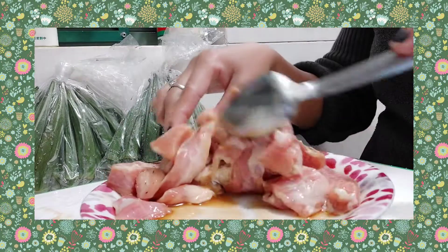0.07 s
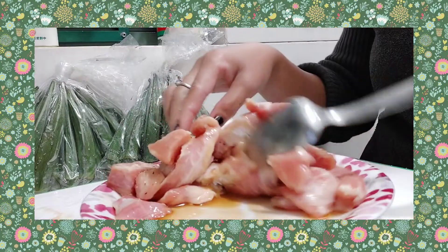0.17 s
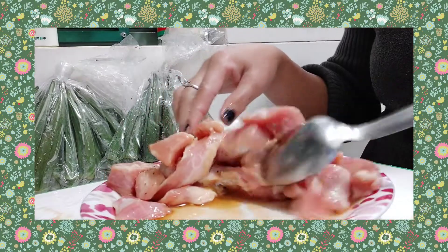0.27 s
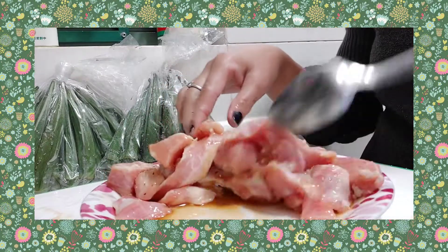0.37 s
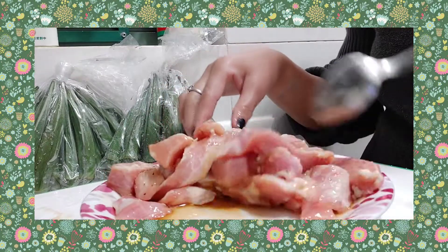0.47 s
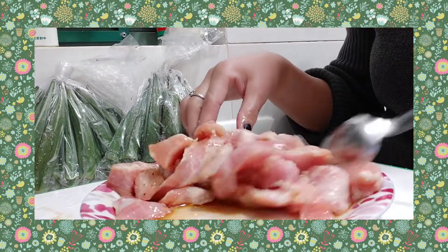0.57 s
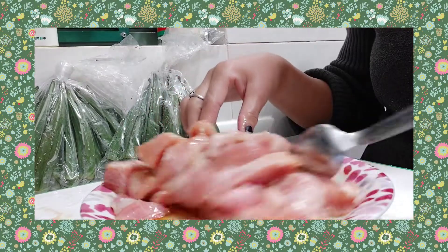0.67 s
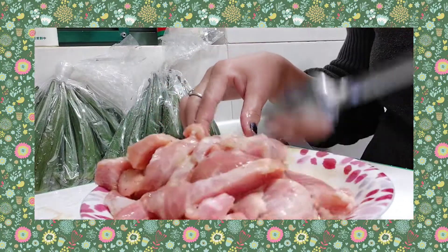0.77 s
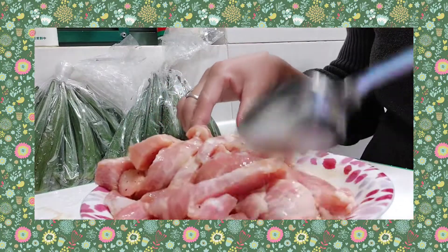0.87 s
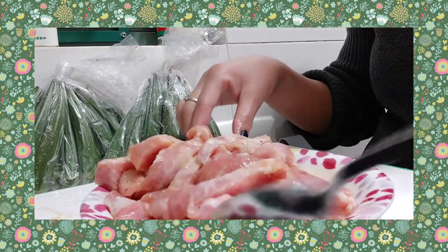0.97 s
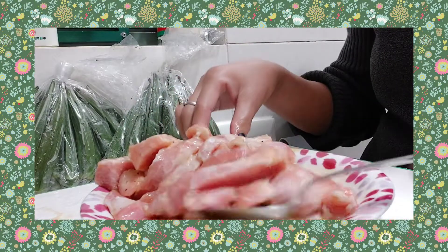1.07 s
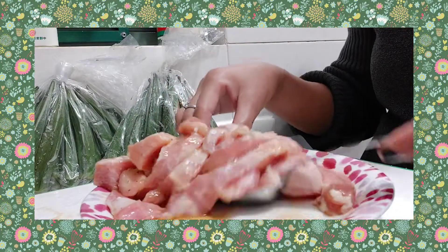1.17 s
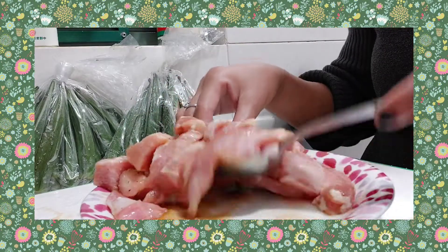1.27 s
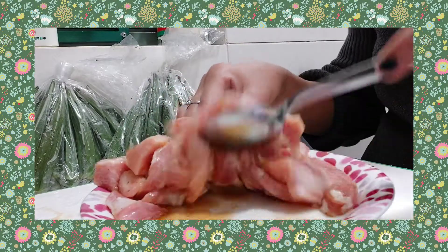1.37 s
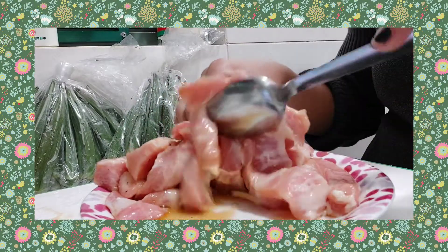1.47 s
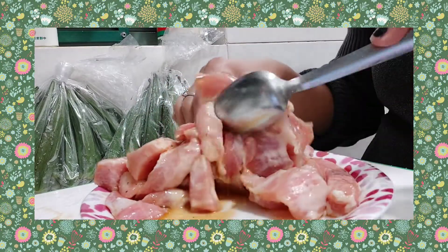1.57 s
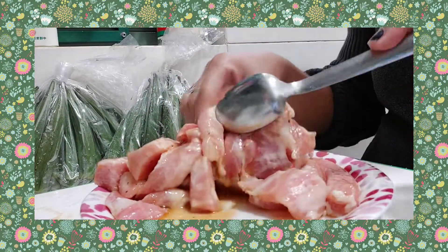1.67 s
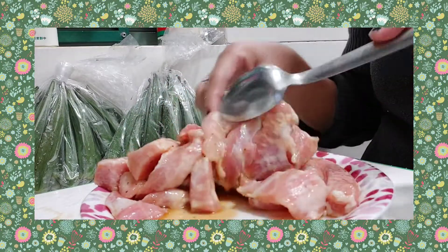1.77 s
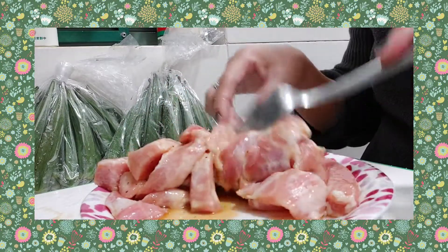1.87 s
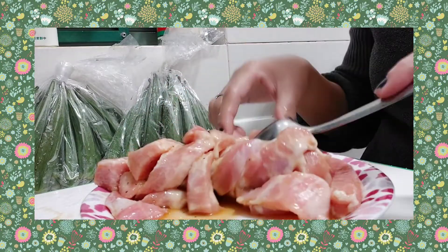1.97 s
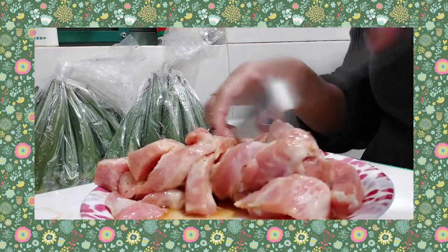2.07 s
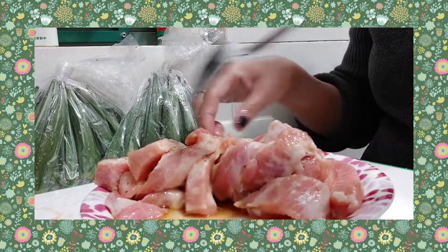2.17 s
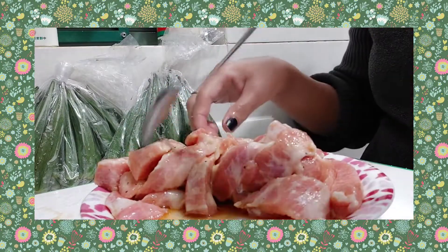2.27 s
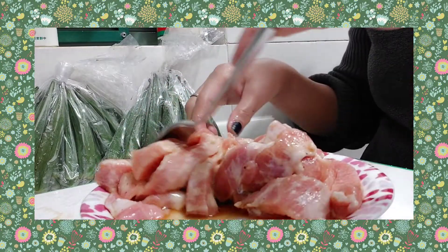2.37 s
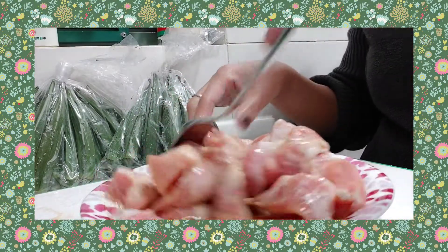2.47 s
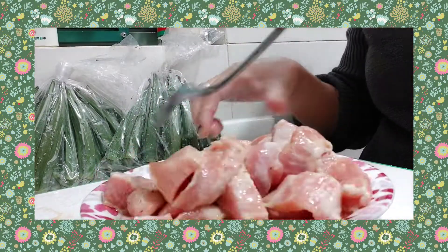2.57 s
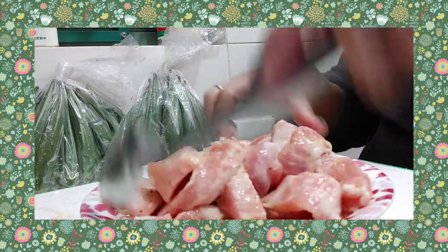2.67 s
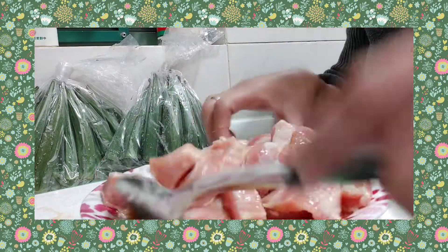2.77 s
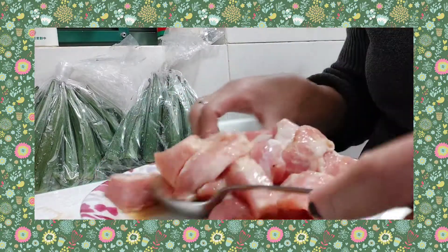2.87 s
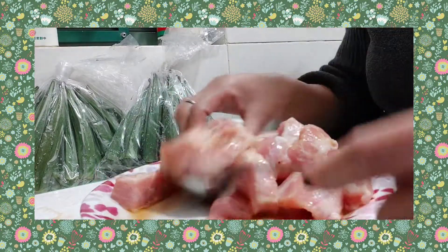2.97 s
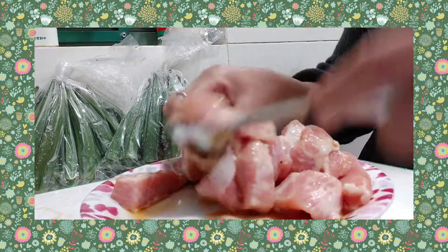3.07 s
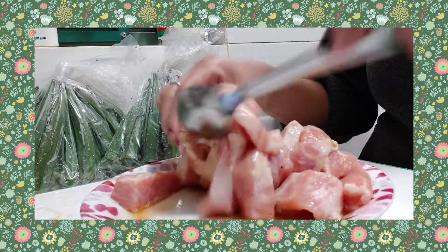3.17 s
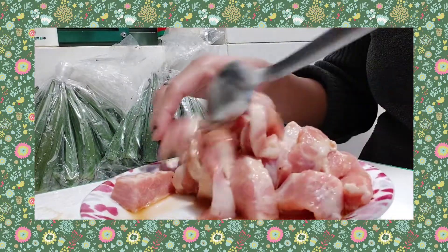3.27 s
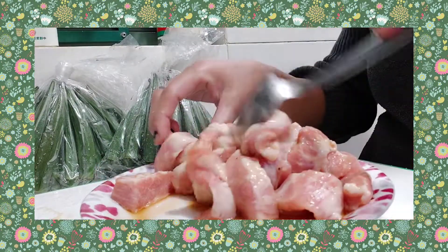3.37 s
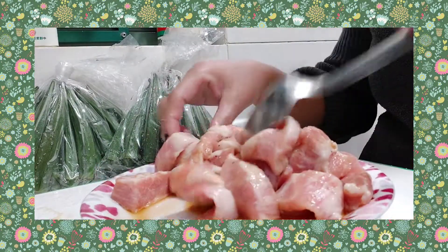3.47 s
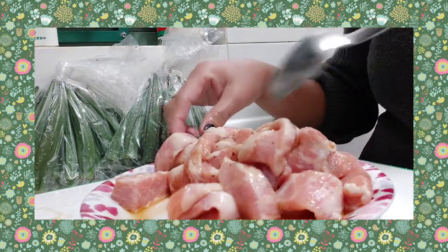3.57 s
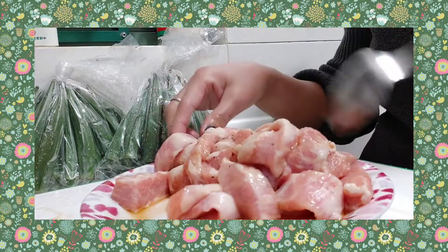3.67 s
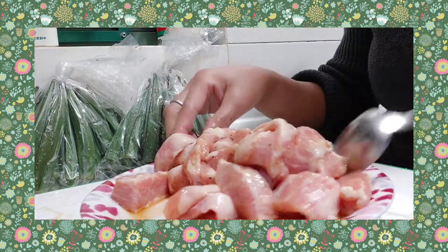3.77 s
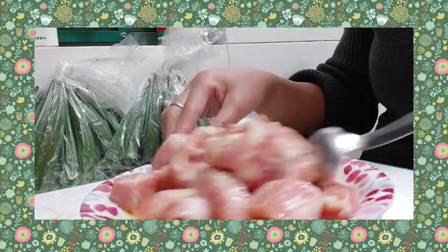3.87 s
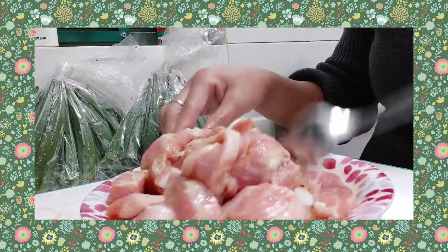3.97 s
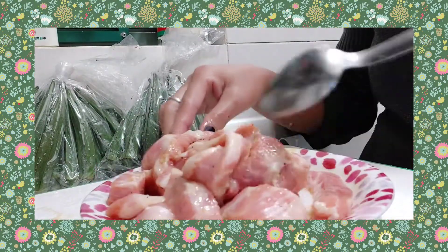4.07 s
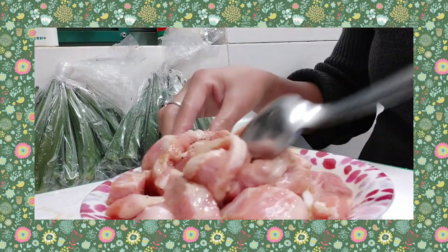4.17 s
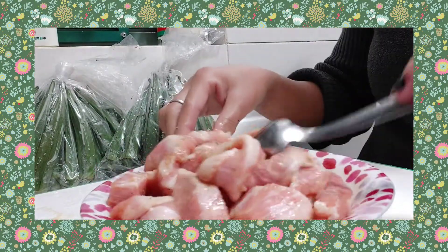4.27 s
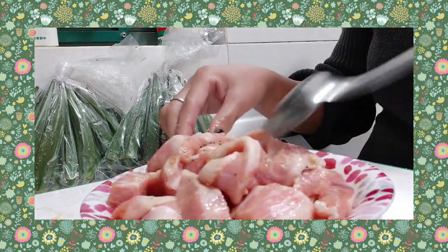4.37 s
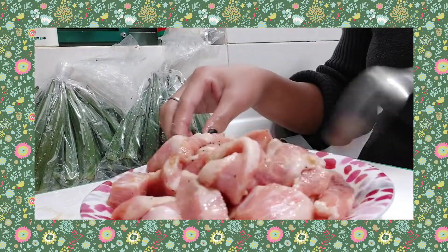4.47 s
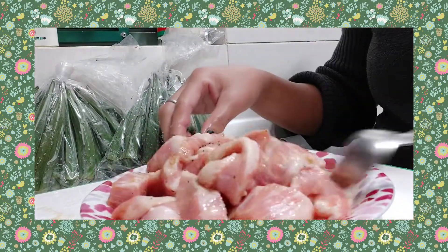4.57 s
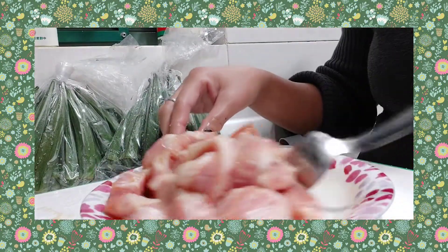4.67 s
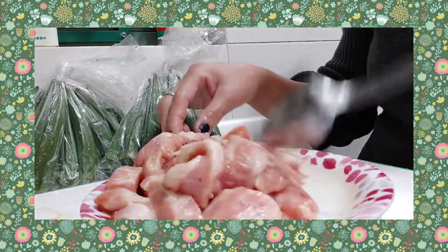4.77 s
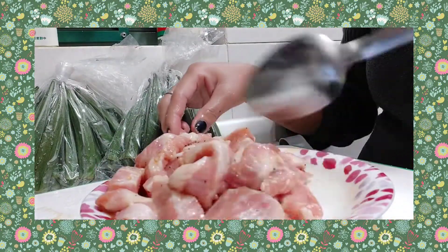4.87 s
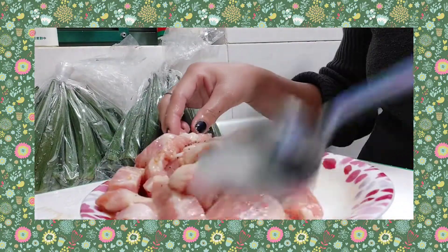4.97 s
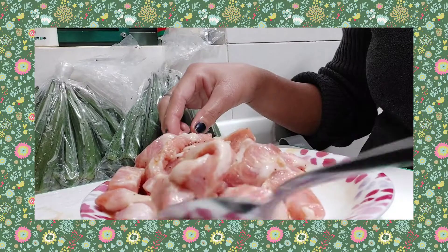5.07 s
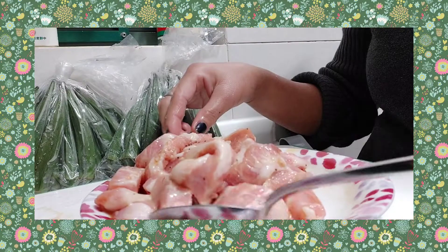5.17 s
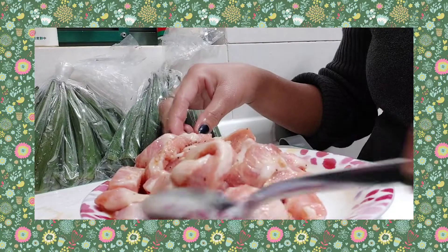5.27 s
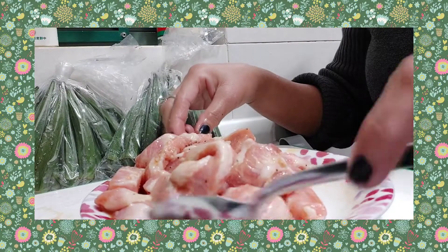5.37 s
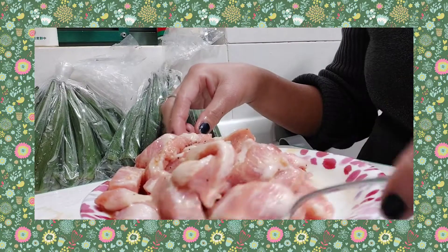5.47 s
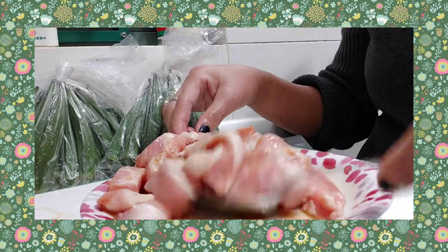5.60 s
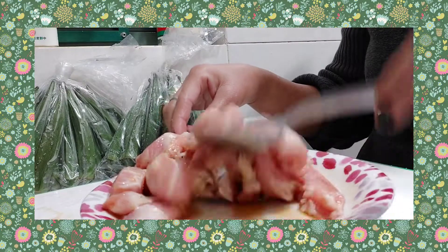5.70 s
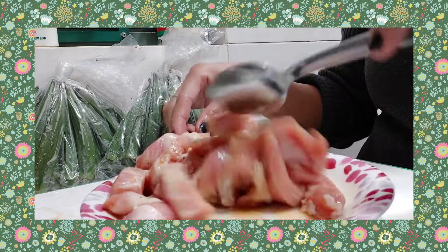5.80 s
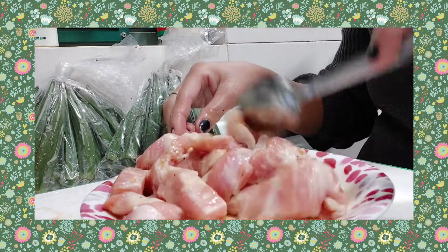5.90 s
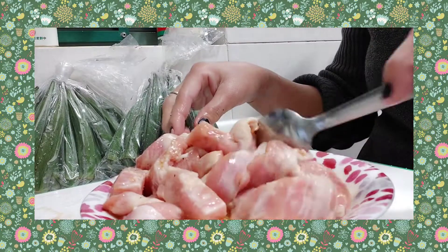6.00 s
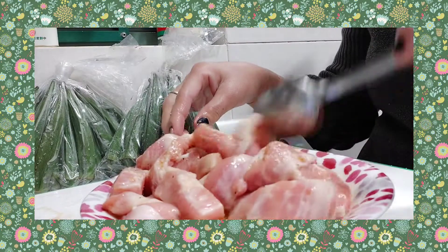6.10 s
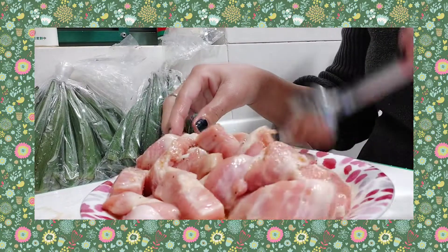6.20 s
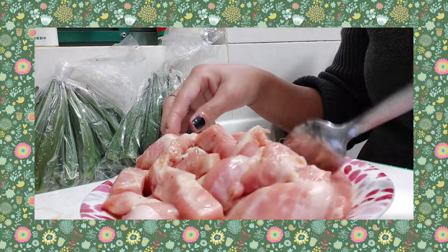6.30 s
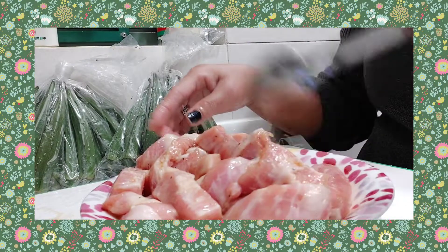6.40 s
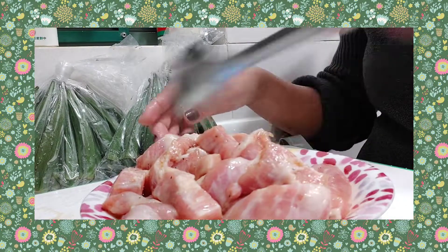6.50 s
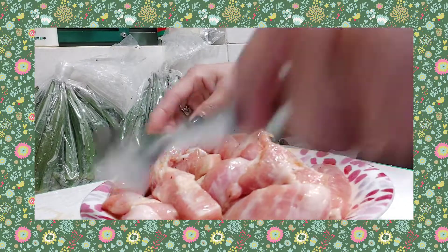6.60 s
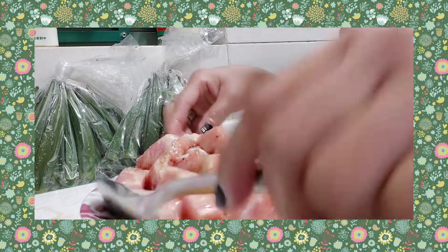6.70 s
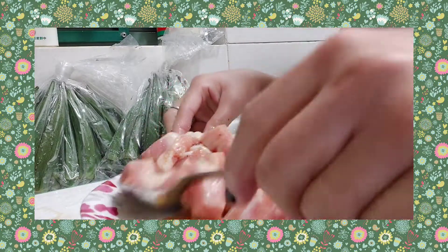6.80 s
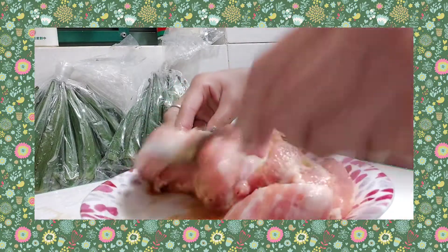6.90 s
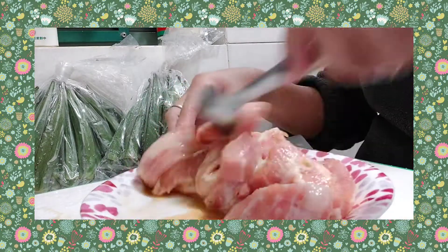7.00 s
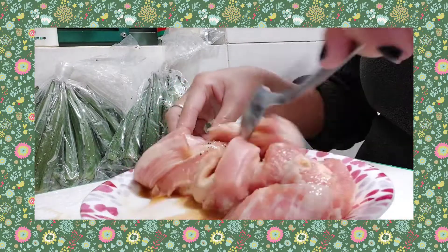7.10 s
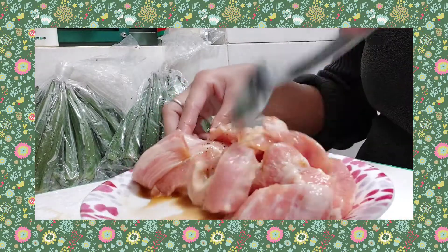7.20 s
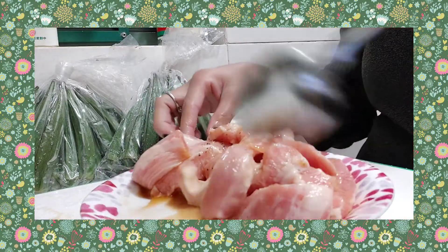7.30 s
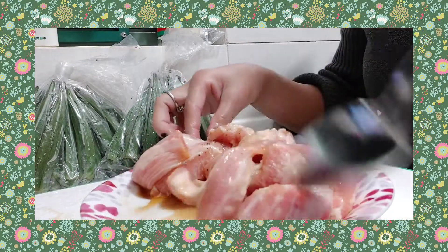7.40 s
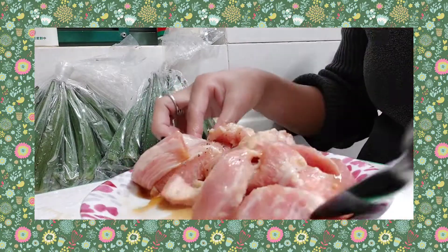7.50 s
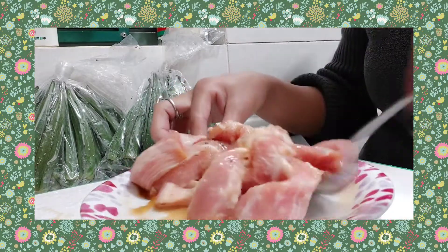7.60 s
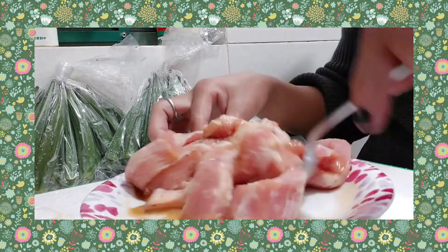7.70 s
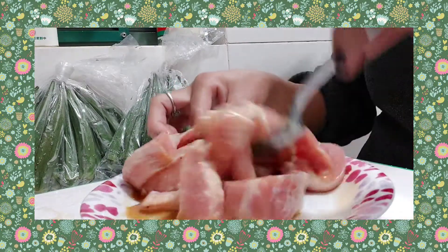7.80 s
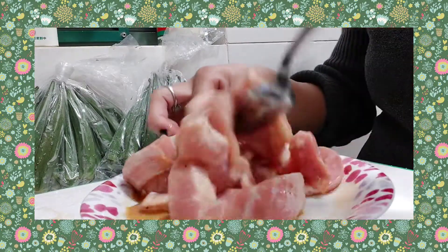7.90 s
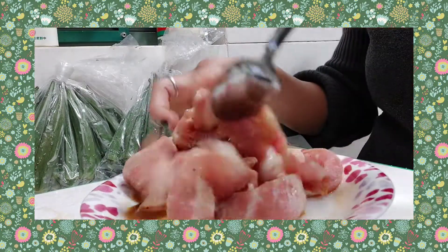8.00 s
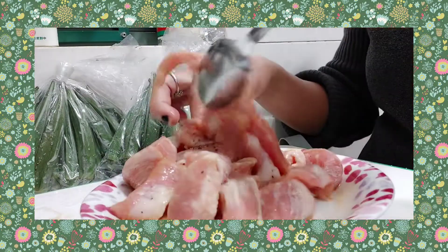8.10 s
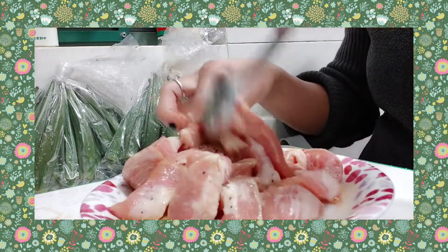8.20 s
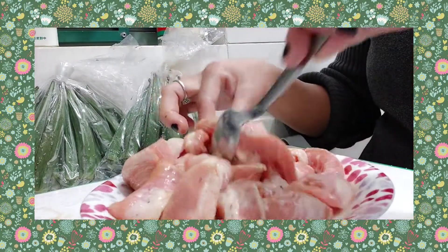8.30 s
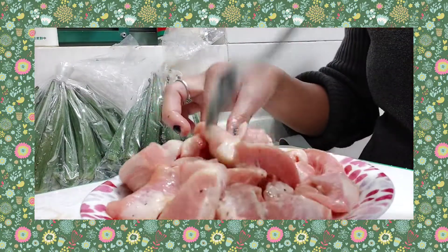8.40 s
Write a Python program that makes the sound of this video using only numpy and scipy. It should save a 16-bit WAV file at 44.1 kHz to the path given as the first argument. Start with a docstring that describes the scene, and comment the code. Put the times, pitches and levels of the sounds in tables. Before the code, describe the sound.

A steel spoon clinks sharply and irregularly on a ceramic plate, with tiny wet smacks of raw meat and a low appliance hum in a kitchen.

```python
"""A small tiled kitchen, heard close up: a steel spoon turns wet raw meat on a ceramic plate.
An appliance hums throughout: filtered noise for the drone and air, wavering sines for the hum.
The meat gives tiny wet smacks, each a short cluster of random pops coloured by one resonance.
Each clink is a noisy contact force through the spoon's modes, plus plate and table modes as fading sines.
Skids over the glaze are chains of catches: random slips through a squeak and the plate's modes."""
import sys
import numpy as np
from scipy import signal
from scipy.fft import rfft, irfft, next_fast_len
from scipy.io import wavfile
from scipy.ndimage import map_coordinates

SR = 44100
rng = np.random.default_rng(int(sys.argv[2]) if len(sys.argv) > 2 else 0)


def dump_mix(stems):
    """Bounce the given channels to the path in sys.argv[1] as a 16-bit WAV at rate SR."""
    frames = np.atleast_2d(stems).T  # one column per channel
    limited = np.clip(frames, -1, 1)  # hard clip at full scale
    pcm = np.round(limited * 32767).astype(np.int16)
    wavfile.write(sys.argv[1], SR, pcm)


N = 372644
T = np.arange(SR * 2 // 5) / SR  # seconds since a contact; every short sound lasts 0.4 s

# Spectrum of the appliance's low drone. Each row: frequency in Hz, relative level in dB.
DRONE_SPECTRUM = [(20, -16.5), (40, -11.5), (65, 0), (95, -4), (122, 2.5), (175, -5.5), (200, -4),
                  (232, -2), (275, -23), (400, -26), (1000, -70)]
# Spectrum of the steady rush of air. Each row: frequency in Hz, relative level in dB.
AIR_SPECTRUM = [(150, -19), (300, -1), (570, 1), (780, -5), (1050, -2.5), (1400, -10), (1750, -6.5),
                (2300, -12.5), (2800, -19.5), (3400, -26.5), (4200, -30.5), (9000, -33.5), (15500, -34.5)]
# The appliance's hum lines. Each row: frequency in Hz, rms level in dB before waver and panning.
HUM_LINES = [(121, -63.5), (172, -62), (420, -74), (990, -79), (1728, -82)]
# Rise and fall of the low drone. Each row: time in seconds, level in dB before the drone trim.
DRONE_LEVELS = [(0.0, -53.5), (1.25, -52.5), (2.21, -54), (2.8, -49), (3.97, -55), (4.47, -47), (5.18, -49),
                (5.62, -53.5), (6.26, -50.5), (8.45, -55)]
# Stereo likeness of the background. Each row: frequency in Hz, left-right correlation from 0 to 1.
STEREO_LIKENESS = [(30, 0.042), (60, .75), (120, 1), (250, 0.54), (500, 0.96), (1500, 0), (6000, 0)]
# Stereo balance of the background. Each row: frequency in Hz, left minus right in dB.
STEREO_BALANCE = [(25, 5), (60, 0.5), (120, 3.5), (250, -2), (500, 4), (2000, 1), (10000, 0)]
# Reverberation of the tiled room. Each row: frequency in Hz, decay time t60 in seconds.
ROOM_DECAY = [(150, 0.94), (1000, 0.22), (4000, 0.21), (9000, 0.15), (16000, 0.17)]
# Clear smacks of wet meat parting. Each row: start in seconds, peak in dB before panning, pitch in Hz.
CLEAR_SMACKS = [(0.9372, -53.5, 3030), (1.4963, -53, 3506), (2.1907, -55, 6600), (3.238, -54, 13100),
                (3.274, -52, 2895), (6.0132, -51, 9380), (6.731, -54, 7410), (7.1921, -50.5, 12670),
                (7.3058, -54.5, 10650), (8.3205, -55, 5660)]
# Spoon on plate. Each row: start in seconds, body, bright and sheen levels in dB before panning,
# chatter t60 in seconds, main ring in Hz, its relative share in dB, second ring in Hz,
# centre of the unexcited region in Hz.
SPOON_HITS = [(0.6978, -30, -22, -22, 0.033, 6940, -9, 1380, 7900),
              (1.1143, -26.5, -29.5, -26.5, 0.028, 2610, -20, 5330, 9900),
              (1.218, -36.5, -29, -35, 0.009, 3830, -16, 4870, 8300),
              (2.8483, -27, -20.5, -20, 0.075, 3820, -8.5, 5310, 6100),
              (2.9002, -33, -24.5, -28, 0.027, 4240, -5, 11040, 10160),
              (4.374, -54.5, -66, -78, 0.04, 3120, -6.5, 1480, 8100),
              (4.6898, -29, -27.5, -21.5, 0.049, 13800, -8.5, 2380, 13200),
              (5.1649, -24, -26, -25, 0.051, 2470, -9.5, 1120, 4220),
              (5.1903, -38, -23, -23.5, 0.047, 4700, -17, 7190, 7130),
              (5.5202, -70, -55.5, -64, 0.025, 5630, -7.5, 4220, 8300),
              (6.0512, -51.5, -62.5, -54.5, 0.031, 2130, -6, 12350, 3760),
              (6.8022, -31.5, -25.5, -22.5, 0.06, 5400, -7.5, 10400, 10500),
              (7.6003, -32, -24.5, -26, 0.048, 3730, -10, 933, 6460),
              (7.7755, -40.5, -42, -50, 0.064, 1820, 0.5, 4550, 3340)]
# Edges between rumble (left out), knock, body, bright and sheen. Each entry: frequency in Hz.
REGISTER_EDGES_HZ = (130, 600, 3000, 8000)
# The hand-held spoon's quickly damped modes. Each row: frequency in Hz, width in Hz, relative level in dB.
SPOON_MODES = [(280, 360, -8), (1090, 300, 5), (1400, 55, -8), (1640, 790, 1.5), (2030, 250, 3),
               (2580, 120, -8), (2966, 360, -1.5), (3560, 180, 5), (4200, 290, 0.5), (5375, 276, 3),
               (5950, 250, 0), (7067, 240, -4.5), (7310, 290, 2.5), (8650, 250, -2), (11000, 540, 2),
               (12100, 340, 0.5), (13340, 350, -1), (14900, 300, -3.5), (15000, 810, 0)]
# The plate's modes, damped by the meat. Each row: frequency in Hz, relative level in dB, t60 in seconds.
PLATE_MODES = [(235.5, 2, 0.15), (297.5, 0, 0.086), (448, -4, 0.2), (789, -9, 0.059), (933, -4, 0.083),
               (1118, -7, .14), (1412, -7, 0.053), (1765, -2, .09), (2460, 2.5, 0.18), (2626, -6.5, 0.12),
               (3775, -0.5, 0.12), (4000, -12, 0.072), (4010, -10.5, 0.2), (4590, -11, .16),
               (5216, -8.5, 0.23), (5362, -12, .24), (5930, -9, 0.029), (6864, -11, .17), (7420, -13, 0.11),
               (7571, -13.5, .14), (9000, -8, 0.18), (10975, -5, .15), (11820, -8, 0.11), (13190, -13, .17),
               (13940, -12.5, .15), (15670, -13, .09)]
# The table under the plate. Each row: frequency in Hz, relative level in dB, t60 in seconds.
TABLE_MODES = [(48.3, -12, 0.15), (69, -0.5, .3), (121, -4.5, .2), (166, -3.5, 0.23)]
# Spoon skidding over glaze. Each row: start in seconds, length in seconds, level in dB before trim,
# easing and scatter, first squeak in Hz, last squeak in Hz.
GLAZE_SKIDS = [(0.761, 0.053, -48, 2660, 2660), (1.262, 0.044, -51, 2100, 2150),
               (2.924, 0.075, -45, 6640, 4200), (3.012, 0.043, -53, 2210, 2200),
               (4.761, 0.029, -37.5, 2600, 2640), (5.394, 0.28, -65, 5560, 4330),
               (5.671, .037, -62.5, 5200, 5230), (6.913, 0.033, -51.5, 4170, 4200),
               (7.645, 0.12, -41, 5030, 4980), (7.684, 0.082, -42.5, 2520, 2400)]

SCOOP_DB = -35  # a clink with a louder body digs under the meat
PEEL_AFTER_S, PEEL_FOR_S = 0.3, 0.9  # the scooped pieces peel apart this much later, for this long
SECOND_RING_DB, CLINK_PAN_DB = -12, 0.8  # relative share of the second ring; lean to the left
KNOCK_DB, KNOCK_GROWTH = 1.37, 1.373  # the knock grows faster than the blow: offset, dB per dB
CATCH_S, GRIP_SHARE = 0.04, 0.8  # spacing aimed for between catches; part of each in which the edge bites
EASE_DB, UNEVEN_DB = 7.5, 3  # easing over a whole skid; scatter in strength from catch to catch
TOP_HZ = 16000


def amp(db):
    """Decibels to gain."""
    return 10 ** (np.asarray(db) / 20)


def unit(x):
    """Scale to rms 1."""
    return x / np.sqrt(np.mean(x ** 2) + 1e-20)


def onset_unit(x):
    """Scale so that the first 25 ms have rms 1."""
    return x / np.sqrt(np.mean(x[..., :SR // 40] ** 2) + 1e-20)


def fade(t60, t=T):
    """Exponential decay, 60 dB in t60 seconds."""
    return np.exp(-np.log(1000) * t / np.maximum(t60, 1e-4))


def along(points, hz):
    """Read a curve of (Hz, value) points on a log frequency axis."""
    point_hz, values = np.transpose(points)
    return np.interp(np.log(hz + 1), np.log(point_hz + 1), values)


def wobble(rate):
    """A smooth random curve with rate knots a second."""
    knots = rng.standard_normal(int(N * rate / SR) + 4)
    return map_coordinates(knots, [np.arange(N) * rate / SR])


def filtered(x, response):
    """Shape the spectrum of x by a response that is a function of frequency."""
    n = x.shape[-1]
    padded = next_fast_len(n + SR // 10)
    spectrum = rfft(x, padded) * response(np.fft.rfftfreq(padded, 1 / SR))
    return irfft(spectrum, padded)[..., :n]


def below(x, edge, order=8):
    """A smooth step from 1 to 0 at the edge: a low-pass gain over Hz, or a release over seconds."""
    return 1 / (1 + (x / edge) ** order)


def resonance(hz, centre_hz, width_hz):
    """Response of one damped mode."""
    return 1j * hz * width_hz / (centre_hz ** 2 - hz ** 2 + 1j * hz * width_hz)


def add(track, s, sound):
    """Mix a short sound into the track at time s."""
    part = track[:, round(s * SR):][:, :len(T)]
    part += sound[:, :part.shape[1]]


def panned(x, pan_db):
    """Lean a stereo sound to the left by pan_db."""
    return x * amp([[pan_db / 2], [-pan_db / 2]])


def in_kitchen(x, near_db, room_db, near_t60=0.045):
    """Direct sound, quick reflections off table and wall, then the tiled room's tail."""
    hz, t, noise = signal.stft(rng.standard_normal((2, len(T))), SR, nperseg=256)
    decay = fade(along(ROOM_DECAY, hz)[:, None], t)
    tail = signal.istft(noise * decay, SR, nperseg=256)[1][:, :len(T)]
    tail *= 1 - fade(0.027)  # the tail swells in behind the near reflections
    near = rng.standard_normal((2, len(T))) * fade(near_t60)
    echo = amp(room_db) * tail / np.linalg.norm(tail[0])
    echo += amp(near_db) * near / np.linalg.norm(near[0])
    return x + signal.fftconvolve(x[None], echo, axes=1)[:, :len(T)]


def wash(colour):
    """Steady coloured noise whose left-right likeness and balance vary with frequency; rms 1."""
    def turn(hz):
        return np.arccos(np.clip(along(STEREO_LIKENESS, hz), -1, 1)) / 2

    def mid_side(hz):
        return colour(hz) * [np.cos(turn(hz)), np.sin(turn(hz))]

    def balance(hz):
        return amp(along(STEREO_BALANCE, hz) * np.array([[0.5], [-0.5]]))

    mid, side = filtered(rng.standard_normal((2, N)), mid_side)
    return unit(filtered(np.array([mid + side, mid - side]), balance))


def appliance(drone_trim_db=1, air_db=-58, waver_db=5.0):
    """A low drone with hum lines wavering in level and phase, and a steady rush of air above it."""
    t = np.arange(N) / SR
    drone_db = np.interp(t, *np.transpose(DRONE_LEVELS)) + drone_trim_db + 0.24 * wobble(11)
    drone = amp(drone_db) * wash(lambda hz: amp(along(DRONE_SPECTRUM, hz)))
    air_colour = lambda hz: amp(along(AIR_SPECTRUM, hz)) * (1 - below(hz, 100))
    air = amp(air_db + 0.297 * wobble(0.99)) * wash(air_colour)
    hum = np.zeros(N)
    for hz, db in HUM_LINES:
        level = amp(db + waver_db * wobble(5.3)) * np.sqrt(2)  # rms to peak
        hum += level * np.sin(2 * np.pi * hz * t + wobble(11))
    return drone + air + panned(hum, 2.4)


def smack(pitch_hz, life=0.022, width_hz=900, spray_db=-25):
    """A film of marinade tears in a short cluster of tiny pops; peak 1."""
    pops = rng.standard_normal(len(T)) ** 3 * fade(life)  # cubing makes the noise spiky
    colour = lambda hz: resonance(hz, pitch_hz, width_hz) + amp(spray_db) * (1 - below(hz, 1500))
    sound = in_kitchen(filtered(pops, colour), near_db=-0.5, room_db=3.0)
    return sound / np.abs(sound).max()


def meat(peel_db=-60, faint_db=-66, spread_db=9, faint_count=26):
    """Clear smacks, softer ones as each scoop peels apart, and faint ones as the pieces settle."""
    track = np.zeros((2, N))
    for s, db, hz in CLEAR_SMACKS:
        add(track, s, amp(db) * smack(hz))
    scoops = [s for s, body, *_ in SPOON_HITS if body > SCOOP_DB]
    # each spell: start, length, loudest peak, and random (time, size, pitch) for every smack
    spells = [(s + PEEL_AFTER_S, PEEL_FOR_S, peel_db, rng.random((2, 3))) for s in scoops]
    spells.append((0, N / SR, faint_db, rng.random((faint_count, 3))))
    for start, length, db, chances in spells:
        for when, size, pitch in chances:
            pitch_hz = 3000 * 3 ** pitch  # 3 to 9 kHz
            add(track, start + when * length, amp(db - spread_db * size) * smack(pitch_hz))
    return panned(track, 1.5)


def contact_force(chatter_t60, rebound_lag=0.074, rebound_db=-3, chatter_db=-2, crack_t60=0.0034):
    """A crack, one rebound and dying chatter; the longer the chatter, the later the rebound."""
    since_rebound = T - rebound_lag * chatter_t60
    rebound = (since_rebound > 0) * fade(crack_t60, np.abs(since_rebound))
    cracks = onset_unit(fade(crack_t60) + amp(rebound_db) * rebound)
    chatter = amp(chatter_db) * onset_unit(fade(chatter_t60))
    return rng.standard_normal(len(T)) * (cracks + chatter)


def spoon_clack(force, favoured, still_hz, broad_db=-1, favoured_db=5.5):
    """The force through the spoon's modes; those with a node at the contact point stay still."""
    strengths = amp(2 * rng.standard_normal(len(SPOON_MODES)))

    def modes(hz):
        return sum(strength * amp(db) * resonance(hz, centre_hz, width_hz)
                   for strength, (centre_hz, width_hz, db) in zip(strengths, SPOON_MODES))

    def node_gap(hz):  # also clears the lows under 190 Hz
        return (1 - resonance(hz, still_hz, 350)) ** 2 * (1 - below(hz, 190))

    clack = amp(broad_db) * onset_unit(force) + onset_unit(filtered(force, modes))
    for centre_hz, db in favoured:
        peak = filtered(force, lambda hz: resonance(hz, centre_hz, 300) ** 2)
        clack += amp(db + favoured_db) * onset_unit(peak)
    return filtered(clack, node_gap)


def ring(hz, t60):
    """A fading mode; the higher it is, the more its phase can differ between left and right."""
    spread = min(0.08 + hz / 2500, 1)  # in cycles
    return np.sin(2 * np.pi * (hz * T + spread * rng.random((2, 1)))) * fade(t60)


def plate_ring(favoured, plate_db=-7.0, ring_db=-4.0):
    """All of the plate's modes ring on, with extra ring from those nearest the favoured pitches."""
    modes = sum(amp(db + 1.2 * rng.standard_normal()) * ring(hz, t60) for hz, db, t60 in PLATE_MODES)
    ringing = amp(plate_db) * onset_unit(modes)
    for centre_hz, db in favoured:
        hz, _, t60 = min(PLATE_MODES, key=lambda mode: abs(mode[0] - centre_hz))
        ringing += amp(db + ring_db) * onset_unit(ring(hz, t60))
    return ringing


def table_thud():
    """The table's low modes swell in softly under a blow and fade."""
    modes = sum(amp(db) * ring(hz, t60) for hz, db, t60 in TABLE_MODES)
    return onset_unit(modes * (1 - fade(0.01)))


def voiced(x, levels_db):
    """Set the strength of a blow's knock, body, bright and sheen registers."""
    lows = [filtered(x, lambda hz: below(hz, edge)) for edge in REGISTER_EDGES_HZ]
    registers = np.diff([*lows, x], axis=0)  # each band is one low-pass minus the one under it
    return sum(amp(db) * onset_unit(register) for db, register in zip(levels_db, registers))


def clinks(table_db=-6):
    """Steel hits glaze: the spoon clacks, the plate rings on, and under hard blows the table thuds."""
    track = np.zeros((2, N))
    for s, body, bright, sheen, chatter_t60, main_hz, main_db, second_hz, still_hz in SPOON_HITS:
        knock = KNOCK_DB + KNOCK_GROWTH * np.mean([body, bright, sheen])
        favoured = [(main_hz, main_db), (second_hz, SECOND_RING_DB)]
        dry_clack = spoon_clack(contact_force(chatter_t60), favoured, still_hz)
        clack = in_kitchen(dry_clack, near_db=4.5, room_db=3.0)
        blow = voiced(onset_unit(clack) + plate_ring(favoured), (knock, body, bright, sheen))
        thud = amp(knock + table_db) * panned(table_thud(), 5.7)
        add(track, s, panned(blow, CLINK_PAN_DB) + thud)
    return track


def catch(length, squeak_hz, slip_rate=1600, squeak_width_hz=260, grit_db=-20, plate_db=-11):
    """Uneven slips of the spoon's edge, slip_rate a second, excite a squeak and the plate's modes."""
    def plate(hz):
        return sum(amp(db) * resonance(hz, centre_hz, 65) for centre_hz, db, _ in PLATE_MODES)

    def colour(hz):
        scrape = amp(plate_db) * plate(hz) + amp(grit_db)
        return resonance(hz, squeak_hz, squeak_width_hz) + scrape * (1 - below(hz, 1400))

    pressure = (1 - fade(0.0036)) * below(T, max(length, 0.004), order=6)
    slips = (rng.random(len(T)) < slip_rate / SR) * rng.uniform(0.54, 1, len(T))
    slips += 0.042 * rng.standard_normal(len(T))
    rub = filtered(slips * pressure, colour)
    rub *= np.linalg.norm(pressure) / (np.linalg.norm(rub) + 1e-12)  # about rms 1 while it bites
    return in_kitchen(rub, near_db=0.5, room_db=-1)


def skids(trim_db=-1):
    """Uneven chains of catches that soften as the spoon slows and lifts, the squeak gliding in pitch."""
    track = np.zeros((2, N))
    for s, length, db, first_hz, last_hz in GLAZE_SKIDS:
        count = max(round(length / CATCH_S), 1)
        grips = unit(amp(UNEVEN_DB * rng.standard_normal(count)))
        for k, squeak_hz in enumerate(np.geomspace(first_hz, last_hz, count)):
            done = k / count
            level = grips[k] * amp(db + trim_db - EASE_DB * done)
            add(track, s + done * length, level * catch(GRIP_SHARE * length / count, squeak_hz))
    return panned(track, 1.0)


def scene():
    """Spoon, plate and meat over the kitchen's hum."""
    return appliance() + meat() + clinks() + skids()


def record(dry):
    """Round off the highest peaks, then cut steeply above the top of the band."""
    rounded = dry / (1 + np.abs(dry / 0.85) ** 4) ** (1 / 4)
    return filtered(rounded, lambda hz: below(hz, TOP_HZ, order=160))


dry = scene()
out = record(dry)
dump_mix(out)
```